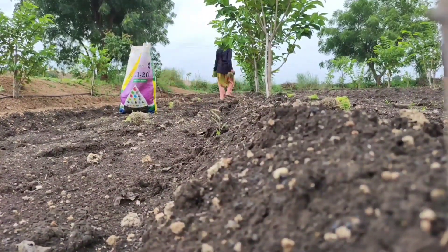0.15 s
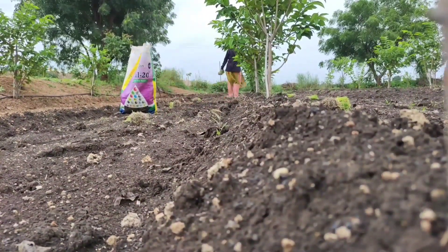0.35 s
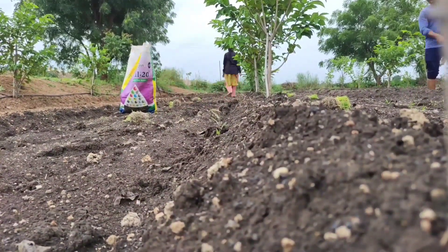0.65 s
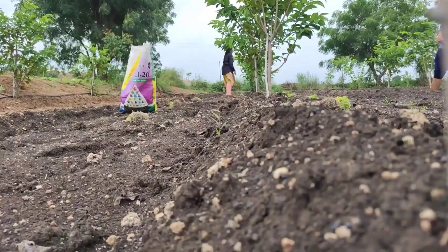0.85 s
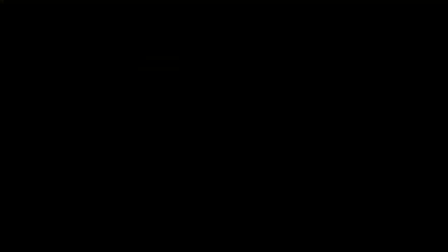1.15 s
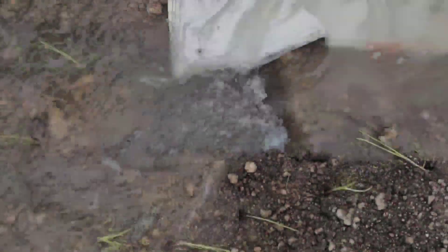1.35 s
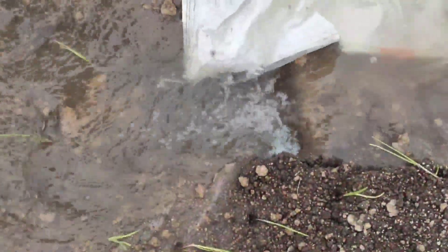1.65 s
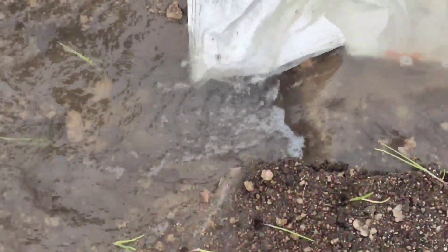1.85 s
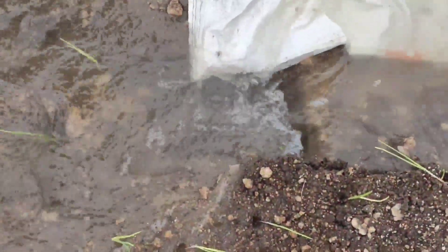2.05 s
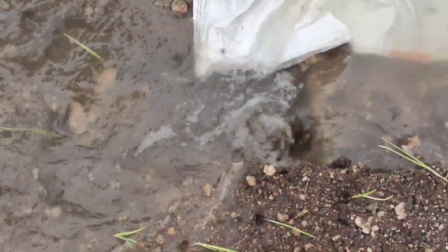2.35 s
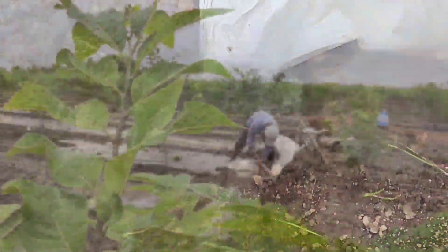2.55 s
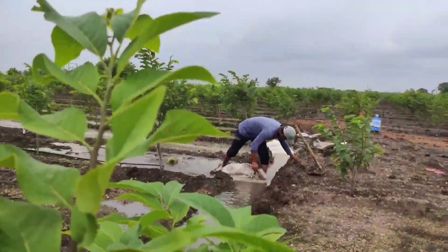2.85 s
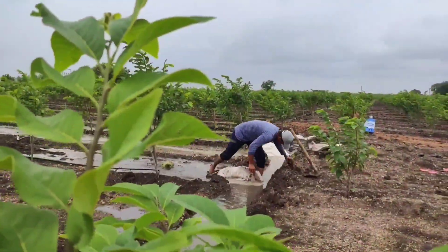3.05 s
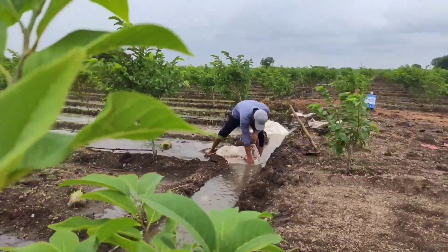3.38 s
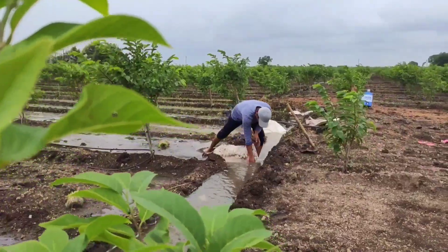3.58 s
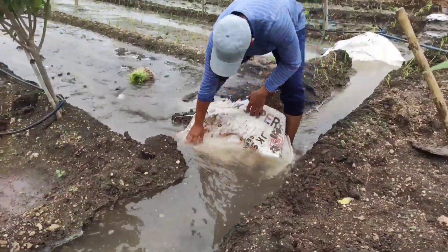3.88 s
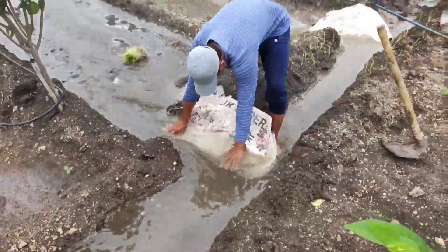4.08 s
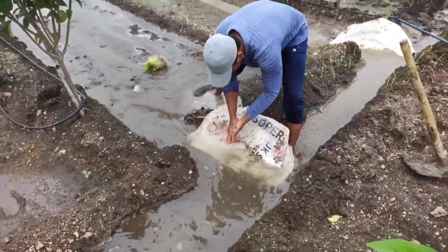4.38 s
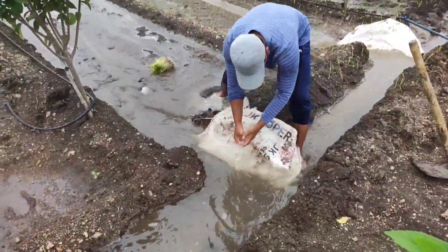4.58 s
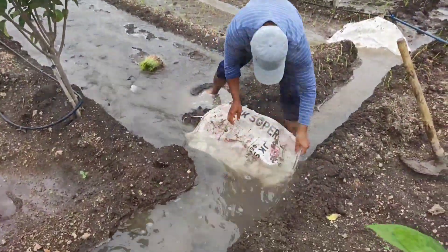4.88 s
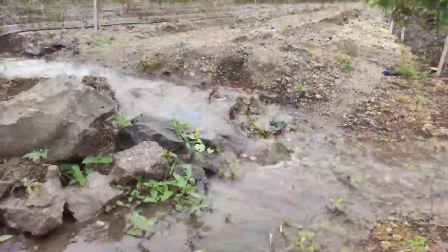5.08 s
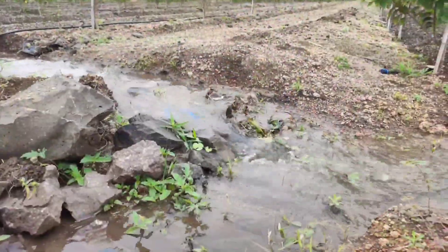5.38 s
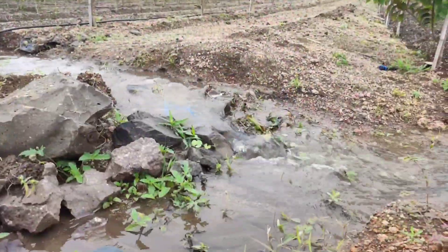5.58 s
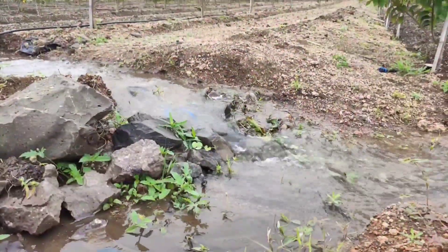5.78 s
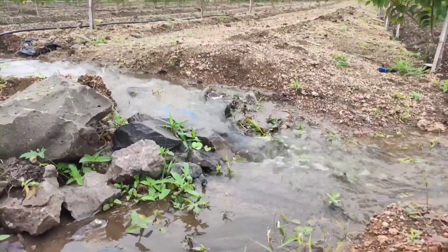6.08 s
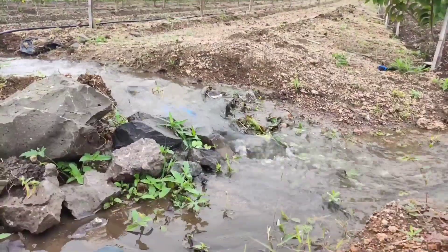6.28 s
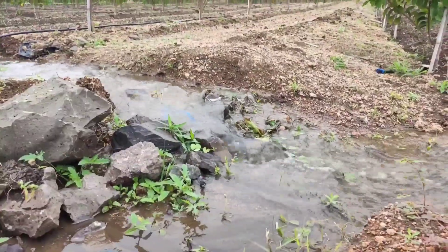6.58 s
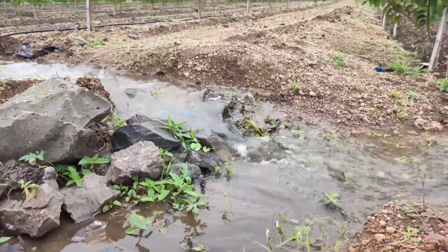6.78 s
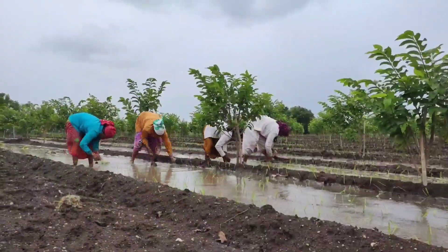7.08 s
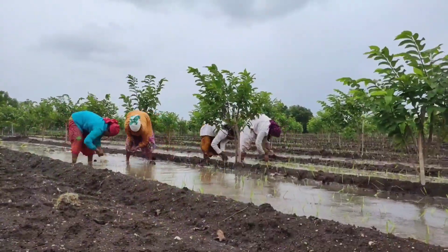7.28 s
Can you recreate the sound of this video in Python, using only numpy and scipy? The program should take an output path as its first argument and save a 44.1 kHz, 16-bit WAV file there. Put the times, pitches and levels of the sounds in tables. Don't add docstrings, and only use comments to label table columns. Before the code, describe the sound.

From 0 to 1.3 seconds, an open field is quiet: thin distant water, soft wind puffs, a few tiny dull footsteps around 0.4-0.6 and a barely audible low motor drone that continues beneath. At 1.3 the sound jumps to close, bubbling water pouring through a gap, with crisp droplets and wind thumps; a small bird gives a rapid gliding warble at 2.1-2.4, towards the right. From 2.8 to 3.7 a gentler furrow trickles with round, rising glugs. From 3.7 to 4.9 water laps and splatters by a sack, swelling near 4.3 then fading, while heavy gusts boom and distort, especially around 4.1 and 4.9. From about 4.95 to 6.9 a loud, bright, continuous rush over stones bubbles and spatters, with a sharp plop near 6.5. It cuts to faint far water and buffeting wind until 7.4.

```python
import sys
import numpy as np
from scipy import signal
from scipy.fft import rfft, irfft
from scipy.io import wavfile
from scipy.ndimage import uniform_filter1d

SR = 44100
rng = np.random.default_rng(int(sys.argv[2]) if len(sys.argv) > 2 else 0)


def natural_amplitude(level_db):
    exponent = np.asarray(level_db, float) / 20
    return 10 ** exponent


def store_wav(level_fs):
    pcm = np.round(np.clip(np.atleast_2d(level_fs), -1, 1) * 32767)
    wavfile.write(sys.argv[1], SR, pcm.T.astype(np.int16))


N = 327663
HZ = np.fft.rfftfreq(N, 1 / SR)

# frequency in Hz, left level in dB per Hz, right level in dB per Hz.
FIELD = [(378, 0.5, -2), (730, -10.5, -9.5), (1110, -13.5, -13.5), (1700, -15, -14.5), (2610, -13, -13),
         (3500, -15, -14.5), (4530, -16.5, -16), (5600, -17, -18.5), (6350, -18, -18), (7200, -16, -18),
         (8000, -13, -22), (8950, -18, -19.5), (12900, -19, -19), (16000, -14, -12.5)]
GAP = [(393, 7, 9), (710, 2, 1), (1200, 2.5, 1.5), (1670, 2, -0.5), (2700, -4, 0), (3500, -4.5, -4),
       (4740, -6.5, 1.5), (5770, -8, 1.5), (6540, -11, 5.5), (7100, -4, 2.5), (7900, -1, -1),
       (8650, -6, -8.5), (11600, -11.5, -9), (15500, -14, -12)]
FURROW = [(400, 0, -6), (695, -2.5, -2), (1100, -3.5, -4), (1650, 0.5, -6), (2560, -7, -6.5),
          (3500, -5.5, -5.5), (4600, -10, 1.5), (5630, -9, -2), (6400, -6, -4), (7200, -5, -5),
          (7960, -0.5, -7), (9000, -6.5, -8.5), (12000, -9, -7.5), (15500, -7.5, -6.5)]
SACK = [(400, 13, 6), (700, 7.5, -21), (1100, 1.5, -5), (1700, -2, -6.5), (2620, -2, -11), (3500, -7, -9),
        (4600, -12, -4.5), (5600, -16, -5), (6400, -15, -6), (7200, -8, -3.5), (8000, 0, -31),
        (8950, -9.5, -9), (12000, -14, -16), (15500, -15, -10.5)]
STONES = [(426, -0.5, -1.5), (685, 3.5, 4), (1230, 6, 7), (1610, 4.5, 5), (2450, 2.5, -1), (3500, 1.5, 5),
          (4600, -4.5, 7), (5800, -5, 6.5), (6800, -5, 5.5), (7200, -16, 4.5), (7650, 3.5, -3),
          (9000, -1.5, -0.5), (12200, -5, -3.5), (15600, -15, -3.5)]
RIGHT_LAG_MS = [
    -0.175,
    0.099,
    0.315,
    0.072,
    0.084,
    0.083,
    -0.0375,
    -0.095,
]
BUBBLE_CYCLES, BUBBLE_RISE = 5.2, 0.075


def in_time(rows):
    s, *columns = np.transpose(rows)
    return [np.interp(np.arange(N) / SR, s, c) for c in columns]


def rms_one(x):
    return x / np.sqrt(np.mean(x ** 2) + 1e-20)


def drift(rate):
    hop = 40
    r = np.exp(-2 * np.pi * rate * hop / SR)
    noise = rng.standard_normal(N // hop + 2002)
    slow = signal.lfilter([1], [1, -2 * r, r * r], noise)[2000:]
    return np.interp(np.arange(N) / hop, np.arange(len(slow)), rms_one(slow))


def colour(points, column):
    points = np.array(points, float)
    return natural_amplitude(np.interp(np.log(HZ + 1), np.log(points[:, 0]), points[:, column]))


def ports(pan_db):
    left = 2 / (1 + natural_amplitude(-pan_db))
    return np.array([left, 2 - left])


def lean(hz):
    # frequency in Hz, left-right difference in dB.
    port_lean = [(800, 2), (2500, 9), (4200, -13), (5600, -21), (6600, -15), (7800, 8), (9700, -4)]
    points = np.array(port_lean, float)
    return np.interp(np.log(hz), np.log(points[:, 0]), points[:, 1])


def add(out, sound, s, pan_db, lag_ms=0):
    i = int(s * SR)
    sound = sound[:N - i]
    late = np.roll(sound, int(lag_ms * SR / 1000))
    out[:, i:i + len(sound)] += ports(pan_db)[:, None] * [sound, late]


def clicks(per_s, spread_db):
    sizes = natural_amplitude(spread_db * np.minimum(rng.exponential(1, N), 4))
    sizes = sizes * rng.choice([-1, 1], N)
    return sizes * (rng.random(N) < per_s / SR)


def scattered(born, most):
    at, right = np.flatnonzero(born), np.zeros(N)
    shift = rng.integers(-most, most + 1, N)[at]
    right[np.clip(at + shift, 0, N - 1)] = born[at]
    return np.array([born, right])


def bubble(hz, cycles, rise):
    turn = np.arange(int(3 * cycles * SR / hz)) * hz / SR / cycles
    shape = 4 * turn * np.exp(1 - 4 * turn)
    return shape * np.sin(2 * np.pi * cycles * (turn + rise * (turn ** 2 - turn / 2)))


def hiss():
    return natural_amplitude(-84) * rng.standard_normal((2, N))


def pump():
    start_s, stop_s, hz, width_hz, db = 0.5, 10, 195, 24, -53
    resonance = 1 / (1 + (2 * (HZ - hz) / width_hz) ** 2)
    drone = irfft(rfft(rng.standard_normal(N)) * resonance, N)
    t = np.arange(N) / SR
    return natural_amplitude(db) * rms_one(drone) * (t > start_s) * (t < stop_s)


def footsteps():
    out = np.zeros((2, N))
    # start in seconds, peak in dB, pitch in Hz, left-right difference in dB.
    steps = [
        (0.411, -41, 554, -7),
        (0.439, -44.5, 594, -7),
        (0.498, -48, 476, -7),
        (0.555, -45.5, 594, -8),
        (0.593, -51, 440, -0.5),
    ]
    for s, db, hz, pan_db in steps:
        add(out, natural_amplitude(db + 4.0) * bubble(hz, cycles=7.2, rise=.01), s, pan_db)
    return out


def bird():
    # start in seconds, length in seconds, start pitch in Hz, end pitch in Hz, peak in dB.
    warble = [(2.102, 0.02, 3830, 3650, -42), (2.114, 0.036, 3450, 3140, -39.5),
              (2.169, 0.018, 2910, 3320, -27), (2.179, 0.024, 3650, 3500, -36),
              (2.191, 0.029, 3470, 3600, -34.5), (2.212, 0.012, 2990, 2770, -35),
              (2.219, 0.017, 2770, 2970, -42), (2.232, 0.024, 3650, 3080, -40),
              (2.26, 0.0055, 2800, 3260, -30), (2.265, 0.0093, 3500, 3830, -29.5),
              (2.268, 0.015, 3480, 2880, -32), (2.283, 0.0085, 3880, 3170, -36),
              (2.285, 0.0099, 3940, 5000, -45), (2.418, 0.0093, 4840, 4900, -43)]
    out, waver, flutter = np.zeros((2, N)), drift(91), drift(150)
    for s, length, hz_from, hz_to, db in warble:
        count = int(length * SR)
        here = slice(int(s * SR), int(s * SR) + count)
        pitch = np.linspace(hz_from, hz_to, count) * (1 + .012 * waver[here])
        shape = np.hanning(count) ** .6 * natural_amplitude(4 * flutter[here])
        add(out, natural_amplitude(db) * shape * np.sin(2 * np.pi * np.cumsum(pitch) / SR), s, pan_db=-17.0)
    echo = np.roll(out[::-1], int(0.0071 * SR), axis=1)
    return out + natural_amplitude(-13.0) * echo


def gusts():
    # start in seconds, left level in dB, right level in dB.
    breeze = [
        (0.0, -53, -43),
        (1.27, -34.5, -38.5),
        (2.778, -39, -41),
        (3.732, -41, -45),
        (4.362, -34.5, -27),
        (5.17, -41.5, -44),
        (6.917, -33.5, -33),
    ]
    # start in seconds, hold in seconds, left level in dB, right level in dB.
    gust_rows = [(0.0, 0.19, -29.5, -43), (0.268, 0.019, -29.5, -54), (0.36, 0.094, -33.5, -43),
                 (0.556, 0.086, -35.5, -38), (0.715, 0.2, -33.5, -37), (1.023, 0.027, -34, -55),
                 (1.375, 0.047, -18, -21.5), (1.462, 0.056, -16, -24), (1.793, 0.049, -24.5, -31),
                 (2.01, 0.019, -26, -36), (2.084, 0.12, -31.5, -29), (2.507, 0.034, -21.5, -34),
                 (2.639, 0.086, -21.5, -27.5), (2.812, 0.067, -30, -38), (3.55, 0.0077, -55, -26),
                 (3.634, 0.053, -39, -64), (3.817, 0.092, -35, -27), (3.983, 0.059, -46, -19.5),
                 (4.09, 0.019, -20.5, -14.5), (4.131, 0.026, -21, -12.5), (4.219, 0.11, -22, -16),
                 (4.482, 0.066, -32, -26.5), (4.682, 0.1, -44, -21.5), (4.926, 0.052, -25.5, -9.5),
                 (5.032, 0.076, -24.5, -13), (6.285, 0.051, -26.5, -30.5), (6.441, 0.096, -24.5, -35.5),
                 (6.784, 0.016, -30, -49), (6.908, 0.02, -27.5, -25), (7.189, 0.039, -23.5, -15),
                 (7.306, 0.22, -29, -27)]
    rise_db_per_s, fall_db_per_s = 222, 218
    t = np.arange(N // 64 + 1) * 64 / SR
    starts, *air = np.transpose(breeze)
    spot = np.searchsorted(starts[1:], t, side="right")
    power = natural_amplitude(np.array(air)[:, spot]) ** 2
    for s, hold, left_db, right_db in gust_rows:
        before, after = np.maximum(s - t, 0), np.maximum(t - s - hold, 0)
        loss_db = rise_db_per_s * before + fall_db_per_s * after
        here = spot == np.searchsorted(starts[1:], s + hold / 2, side="right")
        power = power + here * natural_amplitude(np.array([[left_db], [right_db]]) - loss_db) ** 2
    return [np.interp(np.arange(N) / SR, t, 10 * np.log10(p)) for p in power]


def buffeting(dull):
    edge = 1 / (1 + (330 / (HZ + 1)) ** 4)
    out = np.zeros((2, N))
    for port, db in enumerate(gusts()):
        pops = rms_one(clicks(600, spread_db=3.3)) + .5 * rng.standard_normal(N)
        eddies = rfft(pops * natural_amplitude(5.24 * drift(28.0))) * dull
        body, crest = irfft(eddies * (1 - edge), N), irfft(eddies * edge, N)
        swell = np.sqrt(uniform_filter1d(body ** 2, size=2600) + 1e-12)
        out[port] = natural_amplitude(db) * (body + crest * natural_amplitude(0.45 * (db + 19.5))) / swell
    return out


def thumps(dull):
    # time in seconds (about 7 ms before the middle of the strike), peak in dB, half the left-right
    # difference in dB.
    thump_rows = [(1.503, -13, 18), (1.641, -17, 24), (1.784, -19, 9), (1.813, -19, 15), (1.833, -14.5, 9),
                  (2.473, -14.5, 23.0), (2.71, -14.5, 10), (2.743, -15.5, 15.5), (3.943, -15.5, -6),
                  (4.143, -9, 4), (4.68, -16.5, -12), (4.71, -13.5, -11), (4.735, -12.5, -19),
                  (4.843, -20, -10), (4.927, -5.5, -19), (4.945, -12, -18), (5.15, -12.5, -6),
                  (6.94, -27, -16), (7.145, -12.5, -10), (7.341, -11.5, 19), (7.421, -17.5, 1.5)]
    out = np.zeros((2, N))
    jolt = dull * np.sqrt(HZ) * 1j / (1 + (HZ / 900) ** 2)
    pulse = np.roll(irfft(jolt, N), 900)[:1800] * np.hanning(1800)
    for s, db, pan_db in thump_rows:
        add(out, natural_amplitude(db - 2.5) * pulse / pulse.max(), s - .013, 2.0 * pan_db)
    return out


def heave(hz):
    turn = np.arange(int(1.75 * SR / hz)) * hz / SR
    return -np.sin(2 * np.pi * turn) * np.sqrt(np.hanning(len(turn)))


def heaves():
    # start in seconds, pitch in Hz, peak in dB, left-right difference in dB.
    heave_rows = [(4.091, 200, -9, -13), (4.127, 151, -7, -9), (4.181, 222, -15, -9), (4.236, 191, -31, -6),
                  (4.272, 151, -14, -16), (4.309, 108, -6.5, -26), (4.34, 170, -20, -11),
                  (4.529, 128, -6.5, -32), (4.782, 94, -12.5, -15), (4.799, 256, -14, -18),
                  (4.996, 140, -28, -19), (5.034, 109, -20, -17), (5.095, 111, -7.5, -21),
                  (7.116, 129, -15, -25), (7.2, 177, -15, -13), (7.21, 116, -8, -19)]
    out = np.zeros((2, N))
    add(out, natural_amplitude(-6.3) * heave(74), 4.026, pan_db=-35)
    for s, hz, db, pan_db in heave_rows:
        add(out, natural_amplitude(db - 4.0) * heave(hz), s, pan_db)
    return out


def wind():
    # frequency in Hz, level in dB per Hz.
    eddy = [(15, -58), (30, 4), (80, -1), (130, 0), (250, -7.5), (400, -15.5), (700, -26.5), (1200, -40),
            (3000, -53), (22050, -99)]
    dull = colour(eddy, 1)
    return buffeting(dull) + thumps(dull) + heaves()


def rush():
    alike = .9 / (1 + (HZ / 1900) ** 2)
    mid, side = rfft(rng.standard_normal((2, N)))
    return np.sqrt((1 + alike) / 2) * mid + np.sqrt((1 - alike) / 2) * side * [[1], [-1]]


def grains():
    out, surge = np.zeros((2, N)), drift(22)
    surge = rms_one(surge - uniform_filter1d(surge, size=7000))
    for hz in np.geomspace(420, 14500, 22):
        per_s = 70 * (hz / 1000) ** .7 * natural_amplitude(4.0 * surge + 2.5 * drift(20))
        born = clicks(per_s, spread_db=3.5)
        pocket = bubble(hz, cycles=5.0 * (hz / 1000) ** 0.5, rise=BUBBLE_RISE / 2)
        ring = signal.oaconvolve(scattered(born, 5.6), pocket[None])[:, :N]
        out += rms_one(ring) * np.sqrt(hz)
    born = clicks(800 * natural_amplitude(5 * surge), spread_db=4.5)
    crackle = rng.standard_normal((2, 40)) * np.exp(-np.arange(40) / 5.9)[None]
    ticks = signal.oaconvolve(born[None], np.diff(crackle, prepend=0))[:, :N]
    spectrum = rfft(rms_one(out) + 0.79 * rms_one(ticks))
    return spectrum * np.sqrt(N / (uniform_filter1d(np.abs(spectrum) ** 2, size=1500) + N / 20))


def water():
    # time in seconds, level in dB.
    flow = [
        [(0.0, -64), (1.27, -65.5)],
        [(1.27, -53.5), (1.348, -45.5), (1.82, -46.5), (2.446, -43), (2.78, -44.5)],
        [(2.78, -49), (3.55, -49.5), (3.73, -49)],
        [(3.73, -82), (3.76, -54), (3.922, -52.5), (4.08, -48)],
        [(4.08, -46.5), (4.29, -42.5), (4.37, -49), (4.555, -50)],
        [(4.555, -60.5), (4.732, -54.5), (4.928, -65.5)],
        [(4.928, -53), (4.97, -41), (5.31, -39.5), (6.76, -40), (6.92, -39)],
        [(6.92, -57.5), (7.0, -61.5), (7.43, -59)],
    ]
    # colour table, grain share of gurgle 0-1, grain share of spray 0-1, low cut in Hz,
    # spray over gurgle in dB.
    spots = [(FIELD, 0.41, 0.14, 260, 8), (GAP, 0.81, 0.82, 440, 1), (FURROW, 0.83, 0.5, 510, 0.67),
             (SACK, 1, 0.63, 1250, -0.93), (SACK, 0.81, 0.89, 1200, 1.7), (SACK, 1, 0.9, 870, 0.38),
             (STONES, 0.78, 0.84, 110, -0.38), (FIELD, 0.71, 0.25, 320, 5)]
    grainy, smooth, out = grains(), rush(), np.zeros((2, N))
    upper = 1 / (1 + (3300 / (HZ + 1)) ** 8)
    for rows, spot, lag_ms in zip(flow, spots, RIGHT_LAG_MS):
        table, low_share, high_share, cut_hz, spray_db = spot
        share = np.clip(low_share + (high_share - low_share) * upper, 0, 1)
        late = np.exp(-2j * np.pi * HZ * lag_ms / 1000)
        tone = np.array([colour(table, 1), colour(table, 2) * late])
        tone = tone / np.sqrt(1 + (cut_hz / (HZ + 1)) ** 4)
        source = tone * (np.sqrt(share) * grainy + np.sqrt(1 - share) * smooth)
        here = slice(int(rows[0][0] * SR), int(rows[-1][0] * SR))
        levels_db = in_time(rows)[0] + [[0], [spray_db]]
        for part, inside, level_db in zip((1 - upper, upper), (HZ > 1000, HZ > 0), levels_db):
            mid = (source * part).mean(0)[inside]
            scale = np.sqrt(2 * np.sum(np.abs(mid) ** 2)) / N
            out[:, here] += (irfft(source * part, N) * natural_amplitude(level_db) / scale)[:, here]
    return out


def splatters():
    # start in seconds, peak in dB, pitch in Hz.
    tick_rows = [(3.684, -28.5, 4060), (3.948, -41, 6000), (4.448, -30, 7700), (4.583, -33, 6350),
                 (4.618, -40, 5030), (4.6357, -43, 4500), (4.7006, -38, 6500), (4.742, -33, 8300),
                 (4.814, -43, 7000), (4.851, -37, 5500), (4.893, -35, 5800), (4.9436, -30, 5800),
                 (5.984, -19, 7600), (6.948, -37, 4820)]
    out = np.zeros((2, N))
    bursts = rng.standard_normal((len(tick_rows), 90)) * np.exp(-np.arange(90) / 32.0)
    for (s, db, hz), burst in zip(tick_rows, bursts):
        band = signal.butter(1, [0.96 * hz, 1.04 * hz], "band", fs=SR, output="sos")
        tick = signal.sosfilt(band, burst)
        add(out, natural_amplitude(db + 2.0) * tick / np.abs(tick).max(), s, pan_db=-13.0)
    return out


def droplets():
    # start in seconds, peak in dB, pitch in Hz.
    drop_rows = [(1.375, -33, 6100), (1.385, -37.5, 4170), (1.437, -39, 5200), (1.4853, -36, 8260),
                 (1.5856, -33.5, 6540), (1.608, -36, 6230), (1.8844, -36, 6560), (2.069, -30, 6900),
                 (2.195, -34, 6500), (2.276, -26, 6260), (2.293, -28, 6350), (2.576, -30, 7900),
                 (2.5995, -34, 6200), (2.9047, -32.5, 7800), (3.208, -42, 5000), (4.0908, -35, 6800),
                 (4.137, -33.5, 6690), (4.1982, -30, 7150), (5.0756, -36.5, 5960), (5.282, -36, 6540),
                 (5.626, -34.5, 5140), (5.782, -34, 5530), (5.951, -32, 4100), (5.976, -32, 5170),
                 (6.174, -35, 5200), (6.2637, -28.5, 7900), (6.4346, -23.5, 5620), (6.669, -40.5, 3930),
                 (6.684, -30.5, 6240), (6.7643, -34.5, 4280)]
    # start in seconds, peak in dB, pitch in Hz.
    spray_rows = [(1.289, -35, 6700), (1.319, -32.5, 5000), (1.342, -30, 8150), (1.418, -24, 10200),
                  (1.452, -27, 7900), (1.485, -32, 5030), (1.659, -24.5, 6800), (1.716, -27, 6600),
                  (1.731, -31, 4750), (2.904, -33, 5230), (2.993, -39, 4500), (3.429, -32, 4970),
                  (3.528, -38, 5500), (3.659, -41, 5600), (5.3, -32, 3700), (5.63, -28, 3240),
                  (6.03, -28, 7000), (6.193, -29, 4100), (6.381, -25, 5300), (6.484, -28, 6400),
                  (6.708, -30, 4340), (6.805, -31, 5800), (6.949, -43, 2900), (5.11, -31, 5200),
                  (5.239, -29, 6300), (5.29, -28, 6800), (5.333, -29, 6000), (5.36, -26, 6200),
                  (5.526, -26, 6000), (0.238, -41, 8000), (4.089, -22.5, 8100), (4.104, -26, 5800),
                  (4.151, -26.5, 5600), (4.16, -28, 7640), (4.227, -32, 8000), (4.266, -29, 5600),
                  (4.329, -33, 5900), (4.387, -27, 7800), (4.415, -31.5, 4740), (4.475, -42, 7400),
                  (4.599, -50, 4900), (4.659, -51, 6600), (4.99, -21.5, 6500), (5.025, -28, 7200)]
    out = np.zeros((2, N))
    for s, db, hz in drop_rows:
        add(out, natural_amplitude(db + 12.5) * bubble(hz, cycles=9.0, rise=0.0078), s, lean(hz))
    for s, db, hz in spray_rows:
        add(out, natural_amplitude(db + 3.0) * bubble(hz, cycles=6.4, rise=0.022), s, lean(hz))
    return out


def plops():
    # start in seconds, peak in dB, pitch in Hz.
    gurgle_rows = [
        (2.859, -21.5, 1440),
        (2.963, -36, 686),
        (2.977, -26.5, 920),
        (3.098, -32.5, 800),
        (3.114, -28.5, 610),
        (3.378, -31, 625),
        (3.439, -31, 835),
        (3.511, -33, 623),
        (3.604, -42, 778),
        (3.659, -33, 810),
    ]
    # start in seconds, peak in dB, pitch in Hz.
    gap_plops = [(1.322, -27.5, 1470), (1.344, -27, 1130), (1.365, -27, 1390), (1.402, -37, 716),
                 (1.485, -40, 2200), (1.498, -29, 670), (1.58, -24, 610), (1.609, -30, 904),
                 (1.654, -26.5, 1620), (1.713, -24.5, 1230), (1.727, -25, 2330), (1.777, -35, 802),
                 (1.837, -25.5, 980), (1.884, -26, 2620), (1.91, -24.5, 1020), (2.229, -23, 1350),
                 (2.313, -41, 1930), (2.354, -26.5, 1040), (2.385, -24.5, 1180), (2.556, -33, 923),
                 (2.644, -31, 850), (2.661, -25, 1200), (2.684, -29, 2100), (2.711, -36, 760),
                 (2.743, -29, 1230), (2.823, -39, 860), (2.836, -32.5, 730), (3.006, -42, 713),
                 (3.023, -37, 735), (3.053, -39, 1550), (3.18, -34, 680), (3.199, -34, 2300),
                 (3.313, -35, 902), (3.401, -30, 1770), (3.424, -49, 899), (3.538, -39, 850),
                 (3.591, -48, 791), (3.916, -34, 2440), (4.388, -31, 2560), (4.436, -28, 1740)]
    # start in seconds, peak in dB, pitch in Hz.
    stone_plops = [(5.275, -16, 1420), (5.36, -21, 1200), (5.425, -23, 766), (5.464, -25, 1040),
                   (5.543, -17.5, 1270), (5.58, -20, 740), (5.594, -19, 810), (5.616, -20, 880),
                   (5.675, -29, 570), (5.688, -22, 1010), (5.739, -22, 680), (5.758, -19, 1080),
                   (5.792, -24, 1510), (5.814, -20, 1070), (5.904, -28, 625), (5.968, -21, 990),
                   (5.989, -25.5, 732), (6.039, -25, 750), (6.064, -38, 1280), (6.2, -22, 1200),
                   (6.259, -26, 816), (6.275, -18.5, 1430), (6.364, -25, 1710), (6.394, -13.5, 2700),
                   (6.415, -20, 1130), (6.563, -28, 686), (6.581, -17.5, 980), (6.714, -19, 2400),
                   (6.739, -17, 1360), (6.824, -24, 714), (6.872, -29, 1210), (6.911, -19, 1500)]
    # start in seconds, peak in dB, pitch in
    # Hz.
    bold_plops = [(1.27, -22.5, 1750), (1.682, -20, 1460), (4.038, -26, 1890), (1.993, -19, 2350),
                  (2.018, -18.5, 730), (2.034, -14.5, 920), (2.056, -19, 1430), (2.174, -17, 1870),
                  (2.17, -18.5, 1240), (2.254, -13.5, 1650), (2.325, -18.5, 1830), (2.53, -19, 885),
                  (2.58, -20, 860), (2.609, -16.5, 1650), (4.0, -23.5, 1870), (4.234, -20.5, 1660),
                  (4.319, -20.5, 2370), (4.422, -14.5, 2750), (5.114, -17, 1270), (5.209, -14, 3080),
                  (5.267, -16, 1960), (5.506, -21, 1160), (5.139, -17, 3500), (5.861, -19.5, 1140),
                  (6.434, -16, 980), (6.543, -8, 2610), (6.623, -17.5, 1320), (6.684, -18, 1710),
                  (6.764, -17, 1290), (6.818, -17, 1610), (1.343, -23, 2050), (2.341, -20.5, 2950),
                  (3.991, -39, 2240), (4.015, -22.5, 2120), (4.108, -26, 2600), (4.204, -25, 2180),
                  (4.283, -28, 1600), (5.868, -21.5, 790), (4.552, -42, 2470), (5.328, -26, 2650),
                  (5.31, -22, 2950), (5.698, -26, 2300), (5.214, -31, 1250), (5.233, -25, 1550),
                  (6.064, -20, 2700), (6.172, -22, 2580)]
    out = np.zeros((2, N))
    for s, db, hz in gurgle_rows:
        glug = bubble(hz, cycles=7.1, rise=0.2)
        add(out, natural_amplitude(db - 2.5) * glug, s, pan_db=4.0, lag_ms=RIGHT_LAG_MS[2])
    for s, db, hz in gap_plops:
        add(out, natural_amplitude(db - 4.5) * bubble(hz, BUBBLE_CYCLES, BUBBLE_RISE), s, lean(hz))
    for s, db, hz in stone_plops:
        add(out, natural_amplitude(db - 7.5) * bubble(hz, BUBBLE_CYCLES, BUBBLE_RISE), s, pan_db=3.5)
    for s, db, hz in bold_plops:
        add(out, natural_amplitude(db - 6.5) * bubble(hz, BUBBLE_CYCLES, BUBBLE_RISE), s, lean(hz))
    return out


def scene():
    background = pump() + footsteps() + bird() + wind()
    return background + water() + splatters() + droplets() + plops()


def roll_off(x):
    return signal.sosfilt(signal.butter(12, 15760, fs=SR, output="sos"), x)


def record(dry):
    noisy = dry + hiss()
    top_cut = signal.cheby2(16, 50, 16250, fs=SR, output="sos")
    mix = np.clip(signal.sosfilt(top_cut, noisy), -1, 1)
    return roll_off(mix)


dry = scene()
out = record(dry)
store_wav(out)
```